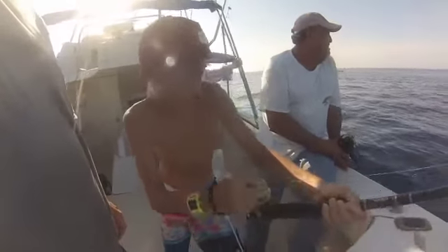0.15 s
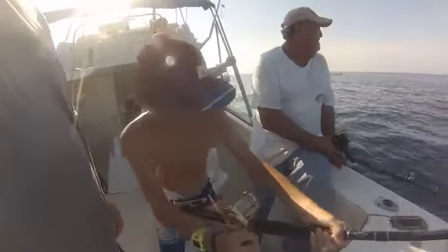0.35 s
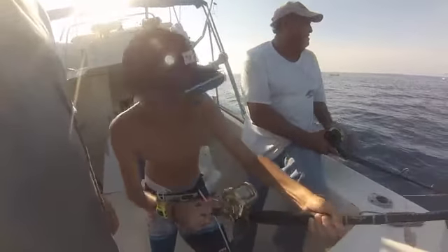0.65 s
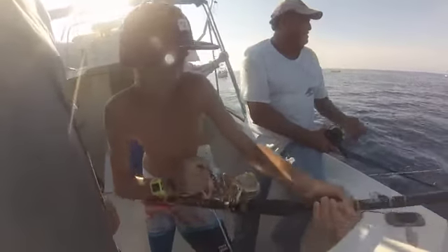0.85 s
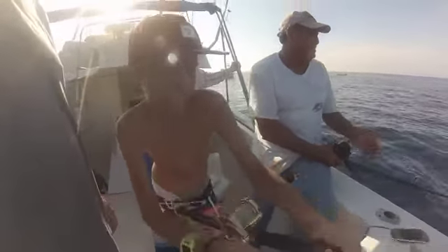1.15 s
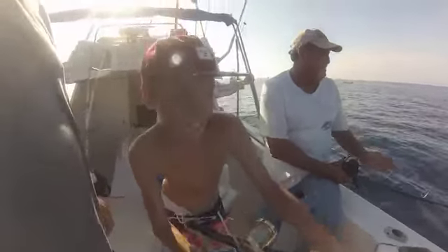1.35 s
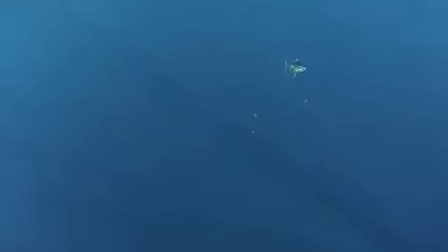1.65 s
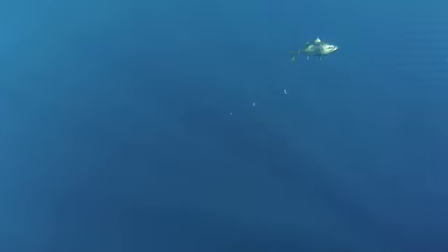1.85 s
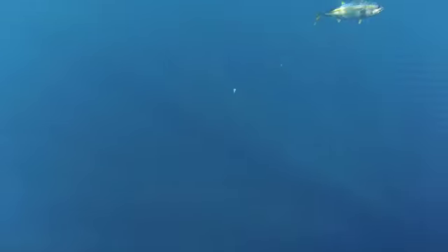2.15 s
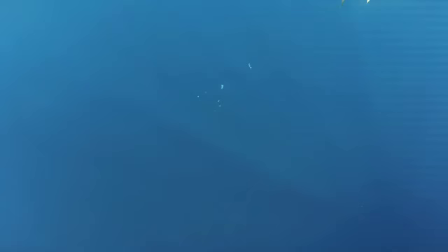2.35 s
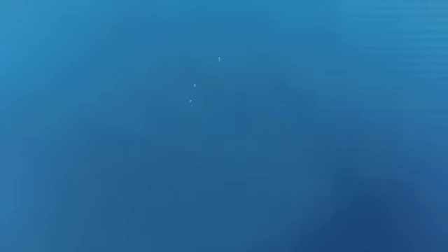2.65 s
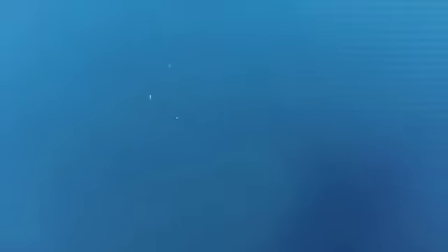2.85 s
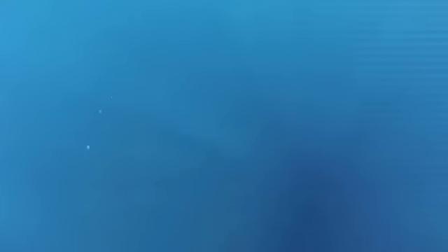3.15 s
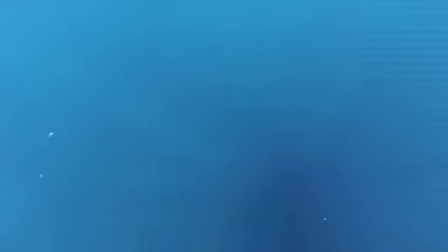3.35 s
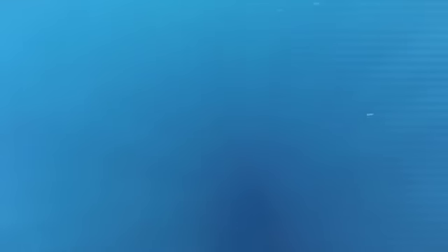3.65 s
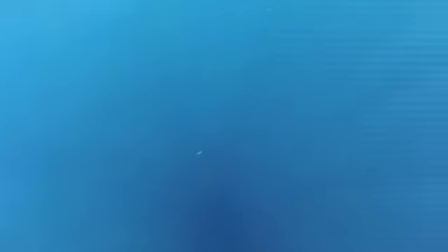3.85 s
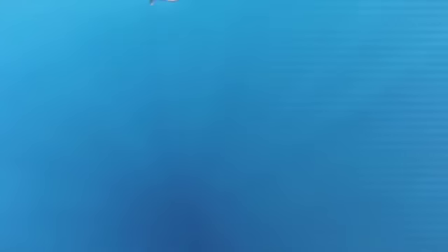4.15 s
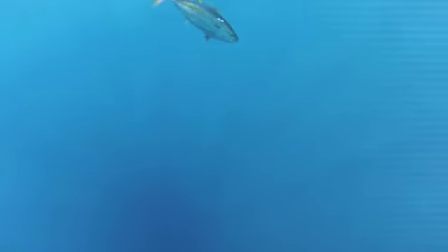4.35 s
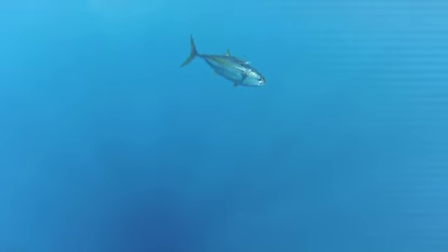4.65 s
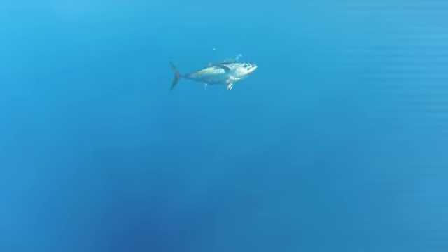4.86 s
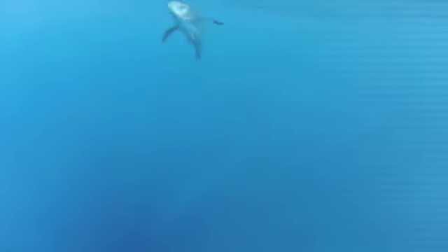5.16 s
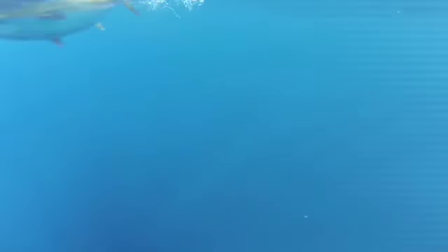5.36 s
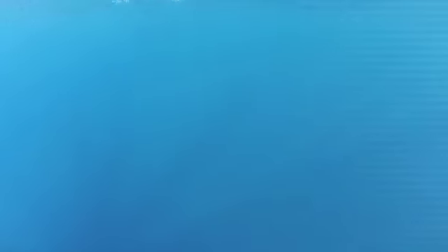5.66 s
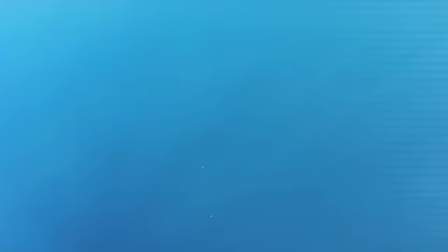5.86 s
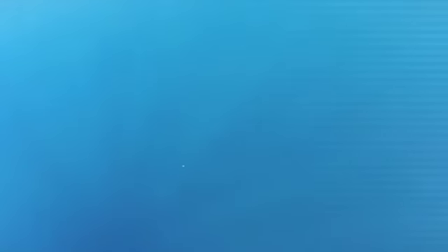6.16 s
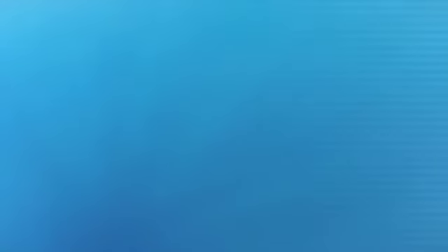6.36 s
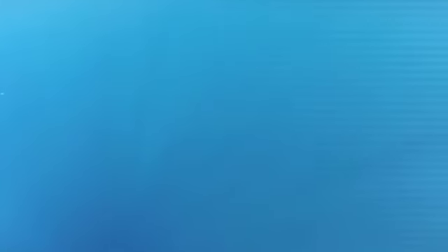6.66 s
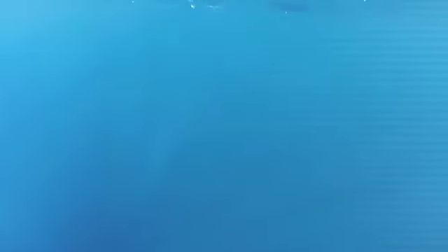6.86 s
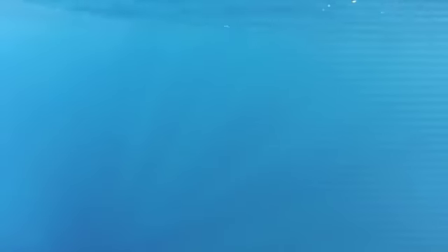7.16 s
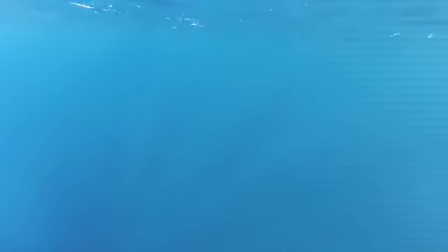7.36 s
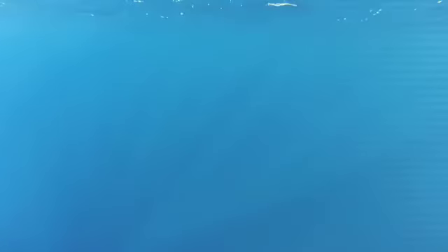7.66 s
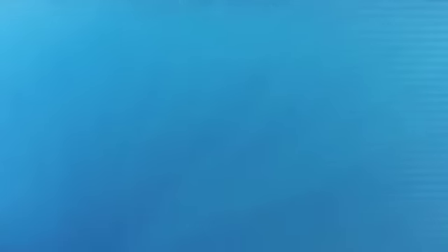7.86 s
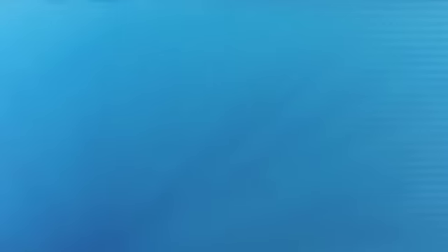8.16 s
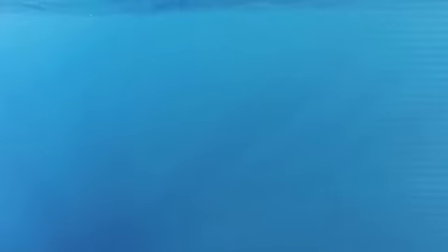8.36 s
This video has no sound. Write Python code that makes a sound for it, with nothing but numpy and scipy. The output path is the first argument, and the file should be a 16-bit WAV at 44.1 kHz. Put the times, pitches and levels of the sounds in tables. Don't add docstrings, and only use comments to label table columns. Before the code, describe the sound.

Below the surface, an idling boat engine throbs and rattles through a camera housing, with low water buffeting, fizzing bubbles and two sharp knocks.

```python
import sys
import numpy as np
from scipy import signal
from scipy.io import wavfile
from scipy.ndimage import uniform_filter1d

SR = 44100
rng = np.random.default_rng(int(sys.argv[2]) if len(sys.argv) > 2 else 0)


def inscribe(sig):
    pcm = np.round(np.clip(np.atleast_2d(sig).T, -1, 1) * 32767)
    wavfile.write(sys.argv[1], SR, pcm.astype(np.int16))


def invert_db(x):
    u = np.asarray(x, float) / 20
    return 10 ** u


N = 375732
T = np.arange(N) / SR

# start_s, rumble_db, sea_and_air_db
DECK_LEVELS = [(0.0, -54.5, -67.5), (0.908, -56.5, -67.5), (1.158, -59.5, -68), (1.22, -57, -67),
               (1.4, -52, -59.5)]
# pitch_hz, level_db (per Hz)
DECK_RUMBLE = [(4.7, -32), (8.0, -36), (20, -14.5), (38, 8), (47, -6.5), (54, -6.5), (100, -28), (130, -59),
               (220, -120)]
# pitch_hz, level_db (per Hz)
DECK_SEA = [(80, -4), (160, -2.5), (260, -10), (350, -14.5), (520, -13), (800, -21.5), (1200, -16),
            (1900, -25.5), (2430, -20.5), (3000, -30), (3800, -29.5), (5000, -32), (7000, -32),
            (12600, -41.5)]

# pitch_hz, level_db (per Hz)
BUFFET = [(4.7, -36), (8.0, -2.5), (33, 2), (41, -6.5), (90, -22.5), (120, -51), (200, -120)]
WASH = [(40, -19), (70, 3), (130, 10.5), (220, -3.5), (400, -22.5), (900, -27.5), (2000, -72.5),
        (20000, -120)]
HISS = [(2500, -6), (4700, -2), (6000, -2), (7500, 0), (8500, -2.5), (10500, -3), (12700, -4), (12900, -12),
        (16000, -16)]
# middle_s, rise_db, length_s
SURGES = [(1.7, 4, 0.05), (2.0, 4.5, 0.14), (3.5, 2, 0.17), (3.95, 8, 0.13), (4.47, 2, 0.28),
          (5.1, 4.5, .2), (5.45, 7, 0.17), (5.85, 14, 0.14), (6.4, 3, 0.26), (6.75, 4.5, 0.066),
          (7.48, 4.5, 0.11), (7.72, -3.5, 0.17), (8.0, -4, 0.29)]
# middle_s, rise_db, length_s
EDDIES = [(2.75, 17, .25), (6.22, 10, 0.15), (7.75, 18.5, 0.13)]
# middle_s, rise_db, length_s
BUBBLE_CLOUDS = [(2.0, 17, 0.9), (2.35, 10.5, 0.2), (4.3, 12, 0.52), (4.85, 16, 0.73), (5.4, 15.5, .4),
                 (5.8, 18.5, 0.44), (6.1, 18.5, .3), (6.6, 12, 0.74), (7.9, 14.5, 1)]

# start_s, peak_db, centre_hz
CREAKS = [(1.6076, -61, 5670), (1.6273, -51, 6450), (2.9107, -68, 6020), (2.943, -31, 6900),
          (2.9772, -49, 5840), (3.025, -40, 7400), (3.1958, -40, 6100), (3.29, -38, 6960),
          (3.3212, -54, 6630), (3.5006, -71, 7570), (3.6017, -75, 6400), (3.6383, -46.5, 13240),
          (4.305, -48.5, 6300), (4.805, -57, 6400), (4.872, -60, 6960), (5.7913, -58.5, 7570),
          (5.9161, -64, 7100), (6.097, -56.5, 9000), (6.192, -49, 6500), (6.2164, -63, 5790),
          (7.389, -60, 7570), (7.7467, -67, 6940), (7.815, -65, 5990), (8.0191, -62, 6680),
          (8.2923, -54, 8710), (8.3339, -58, 7400)]
# start_s, peak_db, centre_hz, t60_s
TAPS = [(2.944, -25, 2910, 0.026), (2.9445, -14, 890, 0.029), (3.2855, -29, 980, 0.024),
        (3.2888, -40.5, 4130, 0.0033), (3.2965, -48, 4270, 0.0038), (3.3605, -65, 5040, 0.0046),
        (7.77, -49, 3550, 0.011)]
# start_s, peak_db, pitch_hz, t60_s
PINGS = [(1.488, -24, 570, 0.25), (1.545, -29.5, 612, 0.35), (1.785, -31.5, 775, 0.096),
         (1.88, -25.5, 440, 0.14), (2.992, -18.5, 210, .08), (3.005, -21, 22.1, 0.53),
         (3.0, -20.5, 45.8, 0.52), (3.346, -21, 221, 0.11), (3.6814, -30, 2260, .04),
         (3.894, -54, 3720, .02), (7.389, -33, 2820, 0.02), (7.68, -35, 662, 0.15)]

# start_s, clack_db, contact_s, direction (sign)
CLACKS = [
    (2.9434, -1, .00065, 1),
    (2.9458, -14, .0011, -1),
    (3.2856, -11, .0011, 1),
]
# start_s, level_db, pitch_factor, rise_s, length_s
SWINGS = [
    (2.9458, -5, 1.04, .0014, .05),
    (3.2878, -6.5, .95, 0.0012, 0.074),
]
# pitch_hz, level_db, t60_s
POLE_MODES = [(101.3, -2.5, 0.29), (223, -1.5, .06), (46, -17.5, 0.45), (24, -18, 0.86), (169.4, -4.5, .06)]

# pitch_hz, level_db
ROUTE = [(170, -30), (300, -30), (600, -10), (1000, -23), (1400, 0), (2000, -18), (3000, -10),
         (4200, -33.5), (6200, -49), (9000, -60)]
# pitch_hz, width_hz, null_hz, null_width_hz
HOUSING = [(246, 23, 267, 90), (416, 150, 489, 90), (526, 36, 582, 240), (601, 71, 638, 27),
           (675, 53, 728, 90), (724, 19, 746, 51), (865, 14, 880, 26), (927, 152, 1046, 41),
           (1104, 149, 1256, 23), (1248, 150, 1347, 33), (1508, 36, 1546, 28), (1625, 85, 1820, 900),
           (1921, 40, 1963, 31), (2258, 44, 2468, 180), (2593, 32, 2605, 46), (2813, 150, 2920, 191),
           (3240, 30, 3256, 90), (3375, 119, 3315, 120), (3549, 65, 3537, 36), (4175, 39, 4210, 63),
           (4453, 71, 4471, 120), (5185, 100, 5050, 280), (5362, 50, 5400, 125)]
# delay_s, share
HULL_ECHOES = [(.0005, .55), (.0009, .5), (.0016, .4)]
# start_s, aim_db
AIM = [(1.55, -7), (1.72, -0.5), (2.2, -0.5), (2.7, -0.5), (3.36, 3), (3.8, 3), (4.34, 1.5), (5.0, 0),
       (5.65, -3), (5.98, 1), (6.31, 3), (6.64, 2), (6.96, -5), (7.29, -5.5), (7.62, -4), (7.95, 4),
       (8.27, 1.5), (8.52, -9.5)]

# place (twelfths of a cycle), thump_db, knock_db, ring_db, tick_db
BLOWS = [(.08, -2, 3, 4, 7), (.9, 10, 11, 1, 2), (2.0, 0, 4, 4, 9), (2.75, 8, 11.5, 8, 6.5),
         (3.95, 0, 4, 1, 5), (4.67, 4, 10, 6, 6), (5.85, -2, 6, 5, 12), (6.85, 6, 1, 0, -2),
         (7.9, -1, 6, 5, 10), (8.88, -1, 1, 2, 1), (10.05, -1, 2, 0, 5), (11.0, 3, 4, 3, -1)]
# period_cycles, depth_s, latest_at_cycle
HUNT = [(11, .00209, .14), (26, .00162, 3.76)]
PART_EDGES = [170, 470, 760, 1300, 2000, 2520, 3400, 6500]
# rattle_length_s, rattle_db, blow_spread_db, churn_db
PARTS = [
    (.004, -3, 1.5, 4),
    (.003, -7, 1.2, -2),
    (.003, -2, 1.5, 1.5),
    (.002, -4, 1.3, -2.5),
    (.004, -1, 2, 1.5),
    (.002, -4, 1.8, -6.5),
    (.002, -2, 2.2, -4.5),
]
# pitch_hz, width_hz, level_db
BUZZ = [(2526, 140, -59.5), (3770, 150, -71.5)]

# level_db, aim_share, drift_db (per s), loose_db (before seating)
HUM_PATH = (-48.5, 1.2, -1.2, 5.2)
THUMP_PATH = (-41.5, 1.17, -1.37, 0.1)
DRONE_PATH = (-53, 0.66, -0.27, 1.2)
KNOCK_PATH = (-45.5, 1, -0.23, -0.2)
RING_PATH = (-55, -0.25, 0.7, 4.5)
TICK_PATH = (-65.5, 1.6, -.6, -10.5)
CHATTER_PATH = (-74.5, 0.9, 0.37, -1)
BUFFET_PATH = (-41.5, 0.3, -0.63, -0.5)
WASH_PATH = (-60.5, 0.65, -0.4, 9.5)

SEATED_S = 2.944


def evened(x):
    return x / np.sqrt(np.mean(x ** 2) + 1e-20)


def read(points, hz):
    f, value = np.transpose(points)
    return np.interp(np.log(hz + 1), np.log(f + 1), value)


def curves(rows):
    s, *columns = np.transpose(rows)
    return [np.interp(T, s, column) for column in columns]


def swells(rows):
    return sum(db * np.exp(-(2 * (T - s) / length) ** 2) for s, db, length in rows)


def add(mix, s, sound):
    part = mix[round(s * SR):][:len(sound)]
    part += sound[:len(part)]


def arrival(level_db, aim_share, drift_db, loose_db):
    middle_s = 5.0
    aim_db = aim_share * curves(AIM)[0]
    return level_db + aim_db + drift_db * (T - middle_s) + loose_db * (T < SEATED_S)


def noise(spectrum, size=1024, patchy_db=0., flicker_db=0.):
    frames, hz = 4 * N // size + 5, np.fft.rfftfreq(size, 1 / SR)
    a, b, patches = rng.standard_normal((frames, len(hz), 3)).T
    patches = uniform_filter1d(patches, size=12, axis=0)
    patches = evened(uniform_filter1d(patches, size=6, axis=1))
    gusts_db = flicker_db * rng.standard_normal(frames)
    field_db = read(spectrum, hz)[:, None] + patchy_db * patches + gusts_db
    field = (a + 1j * b) * invert_db(field_db)
    return evened(signal.istft(field, nperseg=size, noverlap=3 * size // 4)[1][:N])


def deck():
    rumble_db, sea_db = curves(DECK_LEVELS)
    spectrum = [(40, -33)] + DECK_SEA + [(13500, -53.0)]
    sea = noise(spectrum, size=512, patchy_db=0.75, flicker_db=2.4)
    return invert_db(rumble_db) * noise(DECK_RUMBLE, size=4096) + invert_db(sea_db + 1.0) * sea


def pop_train(per_s, spread_db):
    return invert_db(spread_db * rng.exponential(1, N)) * (rng.random(N) < per_s / SR)


def gurgle():
    out, u = np.zeros(N), np.arange(1500) / SR
    for hz in np.geomspace(280, 780, 16):
        tone = np.sin(2 * np.pi * hz * u * (1 + 1.4 * u))
        bubble = tone * invert_db(-60 * u * hz / 22) * np.minimum(u / 0.0012, 1)
        bubble = bubble * np.hanning(2 * len(u))[len(u):]
        out += signal.oaconvolve(pop_train(150 / 16, 2.5), bubble)[:N]
    fall_db = 14 * np.maximum(T - 2.36, 0)
    onset_db = 20 * np.maximum(1.85 - T, 0)
    return invert_db(arrival(-46, .6, 0, 0) - fall_db - onset_db) * evened(out)


def water():
    buffet_db = arrival(*BUFFET_PATH) + swells(SURGES)
    wash_db = arrival(*WASH_PATH) + swells(EDDIES)
    buffet = invert_db(buffet_db) * noise(BUFFET, size=8192, flicker_db=3.0)
    wash = invert_db(wash_db + 0.5) * noise(WASH, size=2048, patchy_db=6.0, flicker_db=1.5)
    hiss = invert_db(-80.5) * noise(HISS, size=256, flicker_db=3.5)
    return buffet + wash + gurgle() + hiss


def grains(per_s, spread_db, top_hz):
    out, u = np.zeros(N), np.arange(60) / SR
    for hz in np.geomspace(6300, top_hz, 8):
        grain = np.hanning(len(u)) * np.sin(2 * np.pi * hz * u)
        out += signal.oaconvolve(pop_train(per_s / 8, spread_db), grain)[:N] * 6300 / hz
    return evened(out)


def bubbles():
    fizz = invert_db(-99 + swells(BUBBLE_CLOUDS)) * grains(500, 3.8, 8600)
    crackle = invert_db(-91) * grains(25, 6.4, 11000)
    return fizz + crackle


def ticks(rows, width):
    out, t = np.zeros(N), np.arange(2000) / SR
    for s, db, hz, t60 in rows:
        burst = rng.standard_normal(len(t)) * invert_db(-60 * t / t60)
        edges = np.minimum([hz / (1 + width), hz * (1 + width)], .45 * SR)
        snap = signal.sosfilt(signal.butter(2, edges, "bandpass", fs=SR, output="sos"), burst)
        add(out, s, invert_db(db) * snap / abs(snap).max())
    return out


def pings():
    out, t = np.zeros(N), np.arange(SR // 2) / SR
    for s, db, hz, t60 in PINGS:
        onset = np.minimum(t / min(2.2 / hz, .015), 1)
        add(out, s, invert_db(db - 60 * t / t60) * np.sin(2 * np.pi * hz * t) * onset)
    return out


def creaks():
    creak_t60_s = .0055
    dry_creaks = ticks([(*row, creak_t60_s) for row in CREAKS], .3)
    return dry_creaks + ticks(TAPS, .1) + pings()


def knocks(shell):
    grip_t60_s, catch_s = .024, .022
    out, t = np.zeros(N), np.arange(SR // 2) / SR
    for s, clack_db, contact, direction in CLACKS:
        push = np.exp(-.5 * (t[:400] / contact * 3 - 3) ** 2)
        grip = invert_db(-60 * np.arange(len(shell) + 398) / SR / grip_t60_s)
        clack = np.convolve(np.diff(push), shell) * grip
        add(out, s, np.sign(direction) * invert_db(clack_db) * clack / abs(clack).max())
    for s, db, pitch, rise, length in SWINGS:
        swing = sum(invert_db(mode_db - 60 * t / t60) * np.sin(2 * np.pi * hz * pitch * t)
                    for hz, mode_db, t60 in POLE_MODES)
        envelope = np.clip(np.minimum(t / rise, 1 + (length - t) / catch_s), 0, 1)
        add(out, s, invert_db(db) * swing * envelope)
    return out


def housing(size=8192):
    hz = abs(np.fft.fftfreq(size, 1 / SR))
    log_gain = np.log(invert_db(read([(60, -60)] + ROUTE + [(20000, -90)], hz)))
    for f, width, null, null_width in HOUSING:
        dip = null ** 2 - hz ** 2 + 1j * hz * null_width
        peak = f ** 2 - hz ** 2 + 1j * hz * width
        log_gain += np.log(abs(dip / peak))
    return np.fft.ifft(np.exp(np.conj(signal.hilbert(log_gain)))).real[:size // 2]


def scatter(x):
    for delay, share in HULL_ECHOES:
        loop = np.r_[1, np.zeros(round(delay * SR) - 1), -share]
        x = signal.lfilter(loop[::-1], loop, x)
    return x


def camera_buzz(chatter):
    out = np.zeros(N)
    for hz, width_hz, db in BUZZ:
        edges = [hz - width_hz / 2, hz + width_hz / 2]
        band = signal.butter(1, edges, "bandpass", fs=SR, output="sos")
        out += invert_db(db - 8) * (T < SEATED_S) * evened(signal.sosfilt(np.r_[band, band], chatter))
    return out


def engine(shell):
    first_cycle_s, cycle_s, cycles = 1.27429, .218388, 34
    low_lead_s = .0025
    place, thump_db, knock_db, ring_db, tick_db = np.transpose(BLOWS)
    turns = (np.arange(cycles)[:, None] + place / 12).ravel()
    sway_s = sum(depth * np.cos(2 * np.pi * (turns - latest) / period) for period, depth, latest in HUNT)
    jitter_s = .0003 * rng.standard_normal(len(turns))
    blow_s = first_cycle_s + cycle_s * turns + sway_s + jitter_s
    at = np.minimum(blow_s * SR, N - 1).astype(int)

    shared_luck, out = rng.standard_normal(len(turns)), np.zeros(N)
    paths = (HUM_PATH, THUMP_PATH, DRONE_PATH, KNOCK_PATH, RING_PATH, TICK_PATH, CHATTER_PATH)
    blows_db = [thump_db] * 3 + [knock_db, ring_db, tick_db, (knock_db + tick_db) / 2]
    for k, blow_db in enumerate(blows_db):
        length, rattle_db, spread_db, churn_db = PARTS[k]
        luck = .5 * shared_luck + .85 * rng.standard_normal(len(turns))
        push = np.zeros(N)
        lead = round(low_lead_s * SR) * (k < 3)
        push[at - lead] = invert_db(np.resize(blow_db, len(turns)) + spread_db * luck)
        dying = evened(signal.lfilter([1], [1, -np.exp(-1 / (length * SR))], push))
        rattle_level = np.sqrt(invert_db(2 * rattle_db) * dying ** 2 + invert_db(2 * churn_db))
        rattle = rattle_level * rng.standard_normal(N)
        band = signal.butter(4, PART_EDGES[k:k + 2], "bandpass", fs=SR, output="sos")
        part = signal.sosfilt(band, evened(push) + rattle)
        out += invert_db(arrival(*paths[k])) * evened(signal.oaconvolve(part, shell)[:N])
    return out + camera_buzz(rattle)


def scene():
    shell = housing()
    below = water() + bubbles() + creaks() + knocks(shell) + engine(scatter(shell))
    deck_fade = np.interp(T, (1.25, 1.476), [1, 0])
    below_fade = np.interp(T, (1.478, 1.587), [0, 1])
    return (deck() * deck_fade + below * below_fade)[None]


def band_limit(x):
    return signal.sosfilt(signal.butter(12, 14600, fs=SR, output="sos"), x)


def record(dry):
    power_db = 10 * np.log10(abs(uniform_filter1d(dry[0] ** 2, size=200)) + 1e-12)
    fall_db = T * 100.0
    held_db = np.maximum.accumulate(power_db + fall_db) - fall_db
    over_db = np.maximum(held_db + 16, 0)
    late_db = np.r_[np.zeros(300), uniform_filter1d(over_db, size=300)][:N]
    ducked = dry * invert_db(-.3 * late_db)
    return band_limit(np.clip(ducked, -1, 1))


dry = scene()
out = record(dry)
inscribe(out)
```